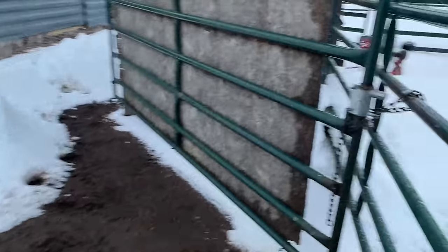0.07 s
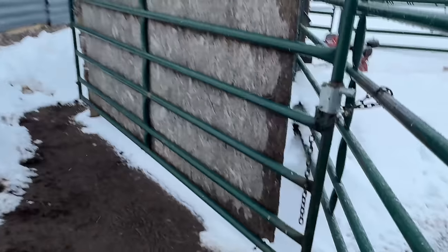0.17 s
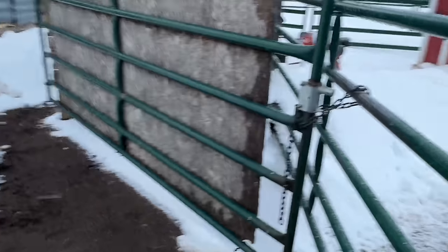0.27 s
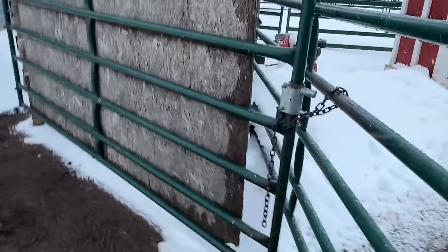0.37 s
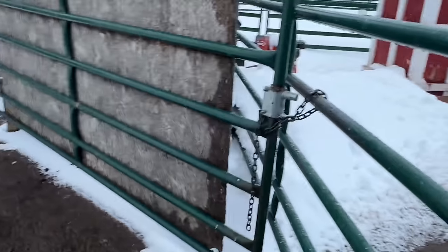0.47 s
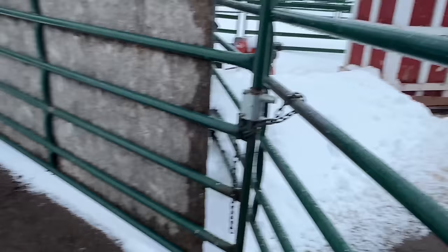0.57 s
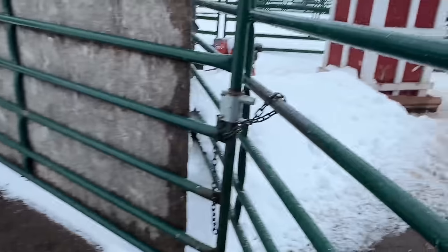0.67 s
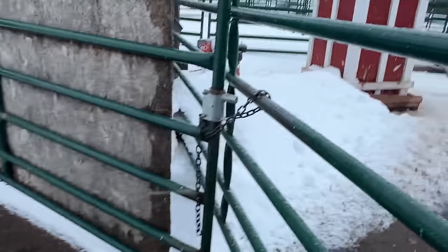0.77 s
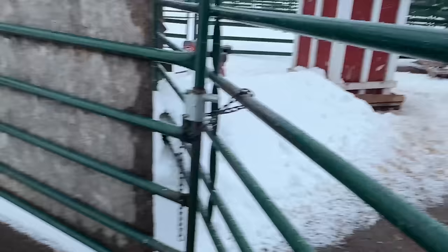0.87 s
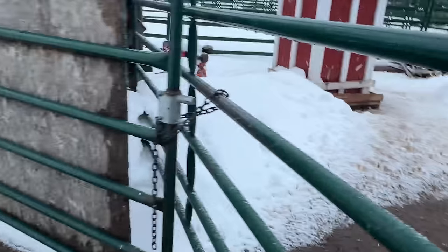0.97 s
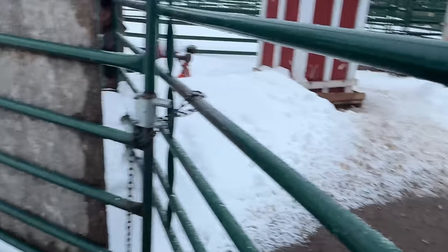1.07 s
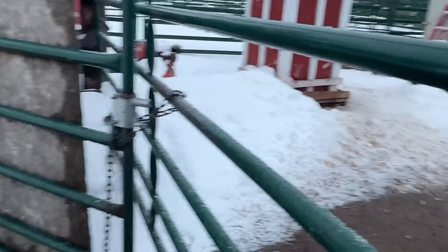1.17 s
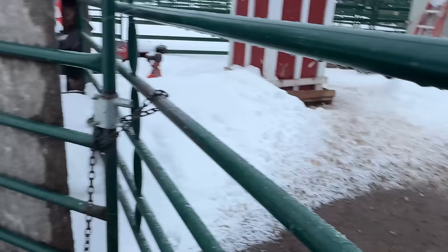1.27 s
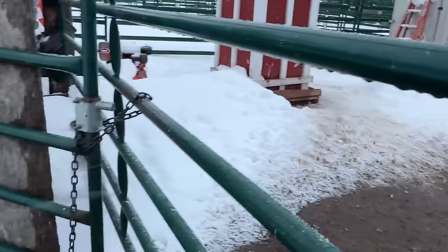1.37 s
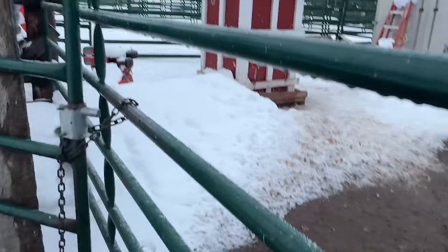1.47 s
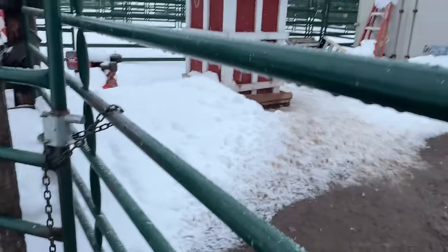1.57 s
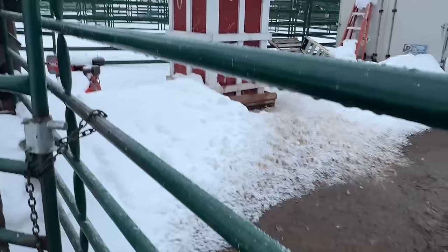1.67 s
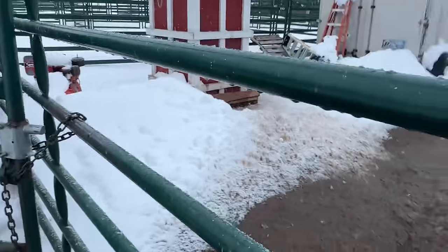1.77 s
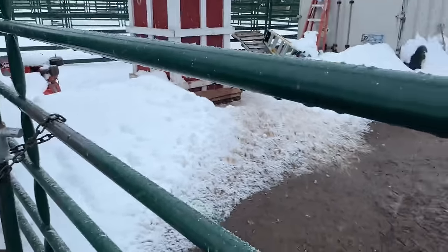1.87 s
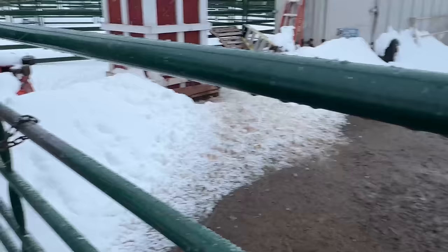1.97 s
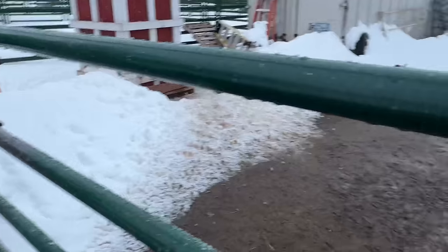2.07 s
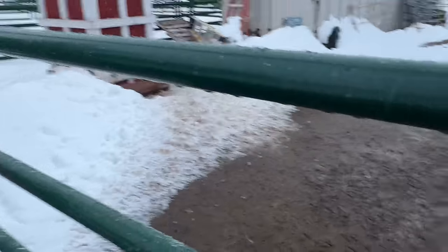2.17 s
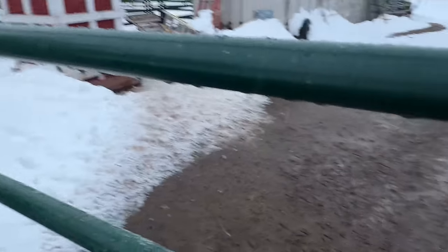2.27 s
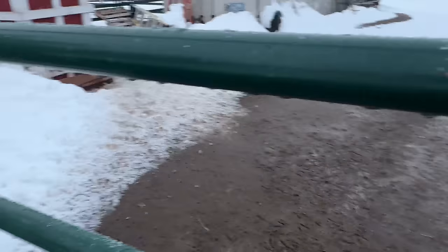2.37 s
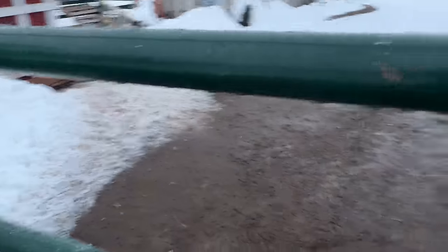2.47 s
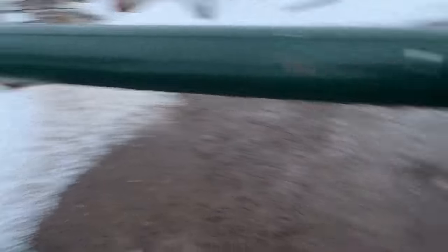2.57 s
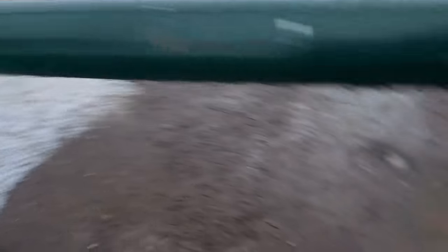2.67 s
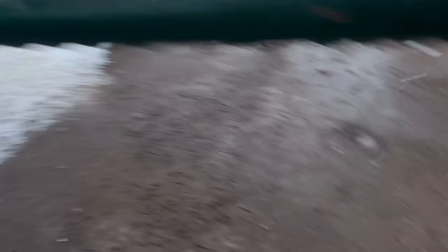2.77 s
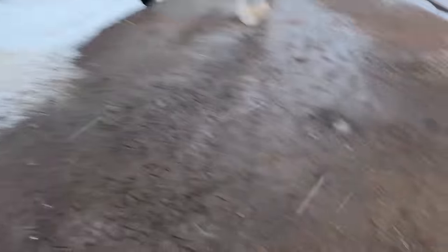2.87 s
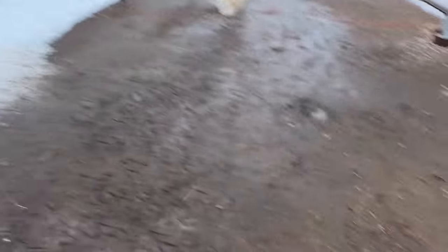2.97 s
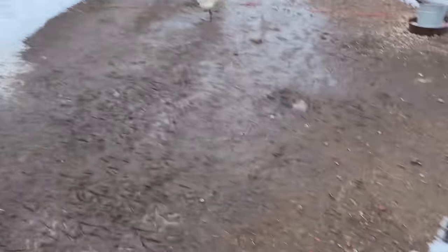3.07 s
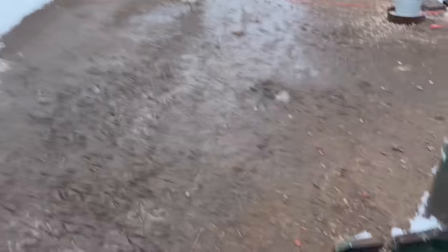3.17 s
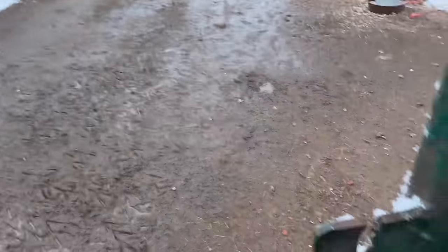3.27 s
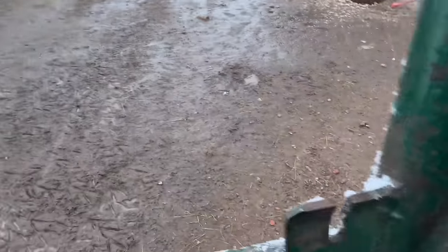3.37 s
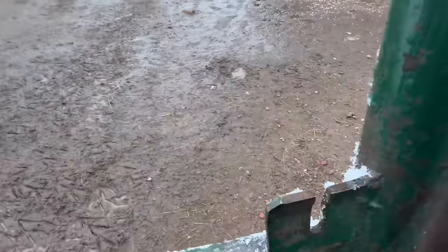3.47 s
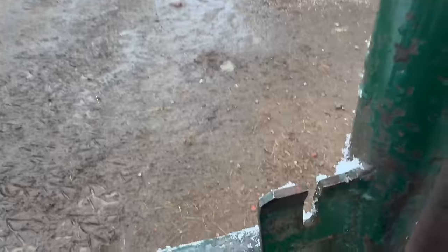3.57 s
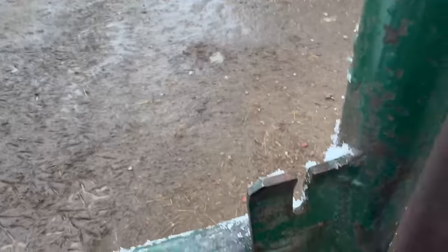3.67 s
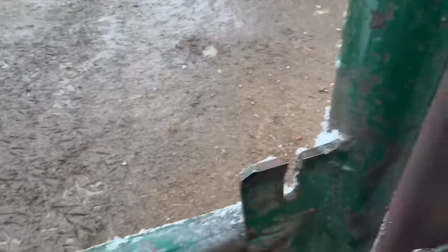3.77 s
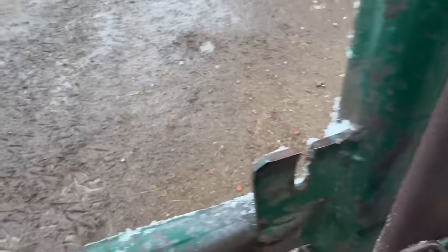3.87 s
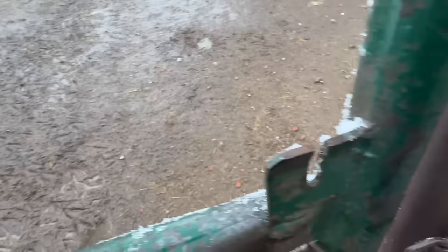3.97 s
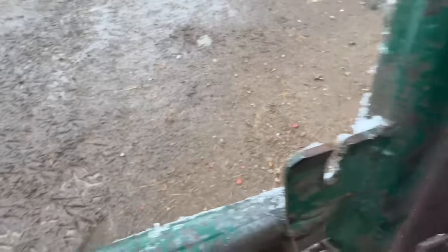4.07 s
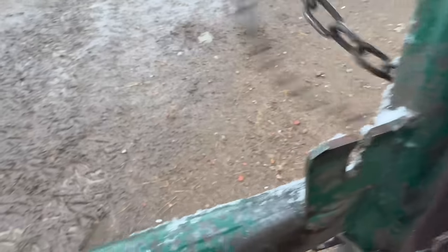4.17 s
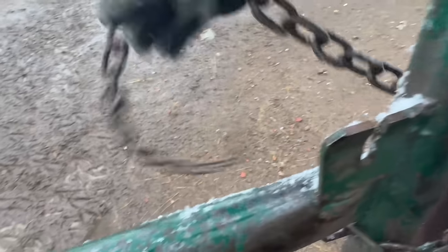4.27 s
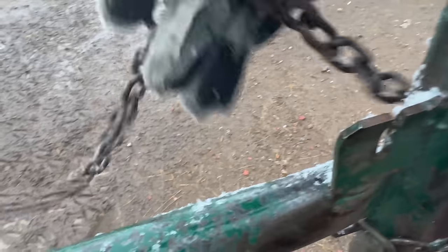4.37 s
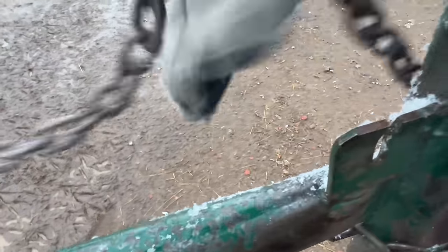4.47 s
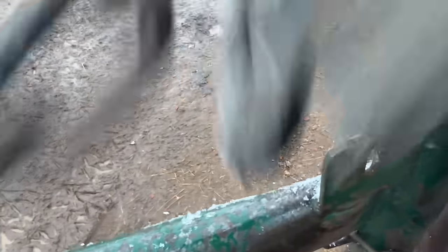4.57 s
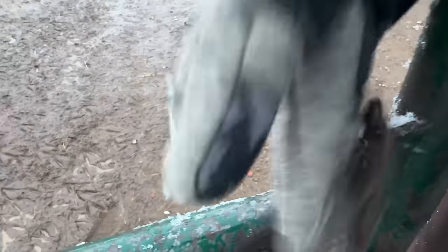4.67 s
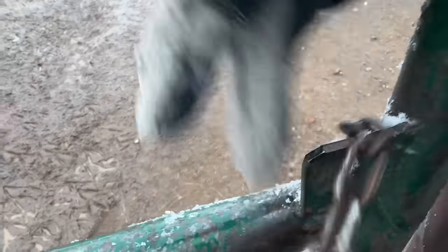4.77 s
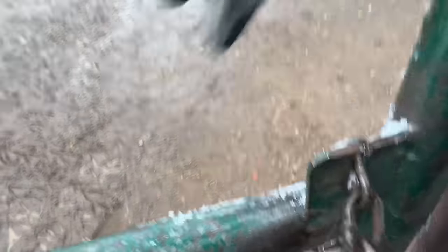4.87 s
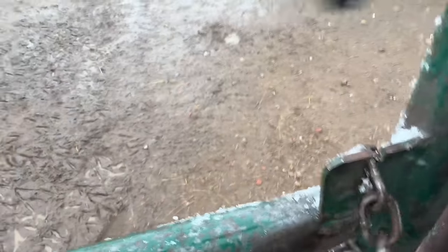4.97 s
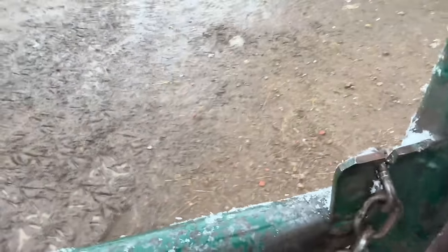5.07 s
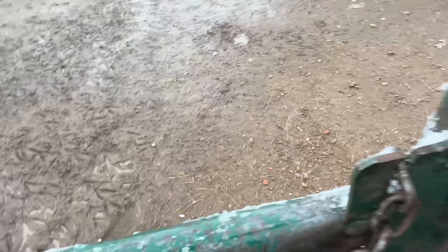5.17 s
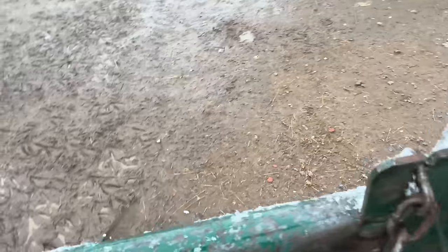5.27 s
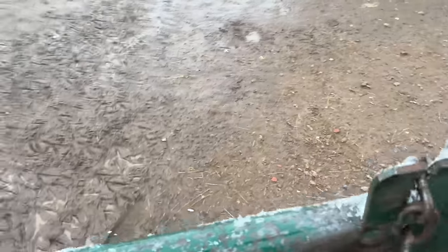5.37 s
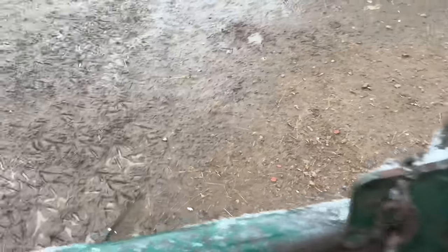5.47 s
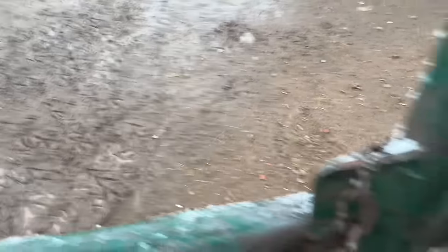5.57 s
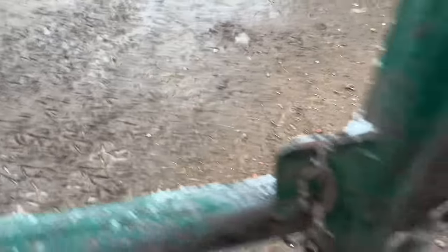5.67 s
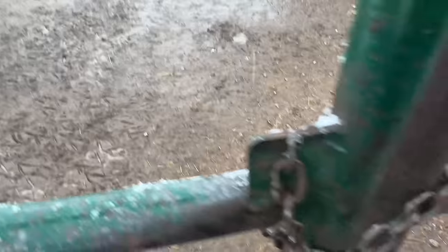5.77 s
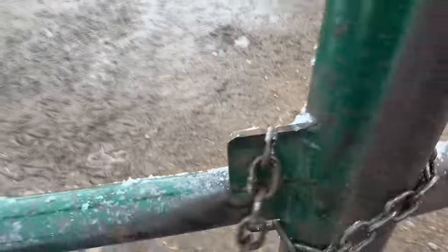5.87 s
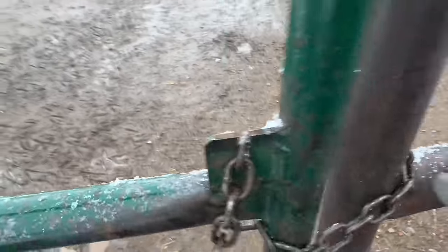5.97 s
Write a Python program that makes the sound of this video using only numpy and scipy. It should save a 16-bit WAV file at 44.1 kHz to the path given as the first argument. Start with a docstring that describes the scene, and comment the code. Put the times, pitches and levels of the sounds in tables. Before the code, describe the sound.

Quiet snowy yard, slushy footsteps and loose gate fittings knocking, then a hand-held chain clinks and clatters loudly onto a steel pipe latch.

```python
"""A steel pipe gate is swung shut in a snowy yard: noisy bursts over crowded modes are its knocking fittings.
A hand-held chain clinks, then lands on post and latch plate, whose damped sine modes ring with every blow.
Filtered noise makes the yard air, boots in slush and rustling clothes; random slips drive the dragging chain
and the groaning hinge. Low damped sines are heels and a bumping glove; gliding sines are melt-water drips."""
import sys
import numpy as np
from scipy import signal
from scipy.fft import irfft
from scipy.io import wavfile

SR = 44100
rng = np.random.default_rng(int(sys.argv[2]) if len(sys.argv) > 2 else 0)


def bounce(signal):
    """Save signal as a 16-bit WAV file at the path given by the first command-line argument."""
    frames = np.transpose(np.atleast_2d(signal))
    limited = np.clip(frames, -1, 1)
    pcm = np.round(limited * 32767).astype(np.int16)
    wavfile.write(sys.argv[1], SR, pcm)


N = 265261
TIME = np.arange(N) / SR  # [s]
BAND_EDGES = 22 * 2 ** (np.arange(30) / 3)  # third octaves [Hz]
BAND_HZ = np.sqrt(BAND_EDGES[1:] * BAND_EDGES[:-1])
CUTOFF_HZ = 15900
RIGHT_DB = -80  # right channel relative to left

# All source levels are relative: the mix applies further gains.
# noise colours of the yard: (frequency [Hz], level [dB per Hz])
YARD_LOW = [(25, -13.5), (50, -4), (90, -0.5), (150, 0), (400, 3), (600, -19), (1000, -55), (3000, -74.5)]
YARD_MIDDLE = [(100, -61.5), (300, -27.5), (550, 7), (1000, 4.5), (2000, 4), (3300, -0.5), (5000, -45),
               (9000, -65)]
YARD_HIGH = [(800, -48), (2200, -43), (3700, 7.5), (6000, 2.5), (9000, -6.5), (12000, -16.5), (15500, -49)]
AIR_LOW_DB, AIR_MIDDLE_DB, AIR_HIGH_DB = -74, -70.5, -78  # still air of the yard
# shuffling boots and rustling clothes: (start [s], length [s], level [dB], treble [dB])
SHUFFLES = [(-.04, 0.24, -61, -8), (0.443, .33, -67.5, -3.5), (0.9, 0.42, -65, -5), (1.664, 0.54, -73, -21),
            (2.054, 0.25, -67.5, -14), (2.673, 0.52, -66, -8), (3.063, 0.49, -68.5, -26),
            (3.856, 0.24, -65.5, -4.5), (4.19, 0.19, -72.5, -3), (4.837, 0.43, -62.5, -9.5),
            (5.45, 0.38, -61, -25)]
SHUFFLE_RISE_S, SHUFFLE_FADE_S, SHUFFLE_BASS_DB = 0.067, 0.083, -8
# slush giving way under a boot: (start [s], level [dB])
SQUASHES = [(.1, -60), (.27, -70), (.91, -64.5)]
SQUASH_S, SQUASH_FADE_S = 0.081, 0.059
# envelope of a boot sliding on wet snow: (time [s], level [dB])
SCUFF = [(0, -67.5), (.09, -59.5), (.18, -67), (.3, -84), (.4, -110)]
# colour of that scuff: (frequency [Hz], level [dB per Hz])
SCUFF_COLOUR = [(400, -56), (1600, -22), (1950, 14), (2400, -34), (6000, -59.5)]
# hanging chain sliding over the moving gate: (start [s], length [s], level [dB])
SLIDES = [(.82, 0.46, -62), (1.15, .15, -61.5), (1.794, 0.29, -66), (2.146, 0.31, -71),
          (2.78, 0.061, -63.5), (3.098, 0.17, -64.5)]
SLIDE_RISE_S, SLIDE_FADE_S, SLIDE_REST_DB = 0.04, 0.12, -80.5
# modes of the gate's far end and its hanging chain: (frequency [Hz], level [dB], t60 [s])
FAR_GATE = [(588.6, -8.5, .3), (629.6, -3.5, 0.29), (683, -5.5, 0.17), (966, -3.5, 0.44),
            (1039, -0.5, 0.19), (1900, -11.5, 0.367), (1910, -1, 0.29), (1957, -1, 0.3), (2347, -2, 0.21),
            (3224, -1, 0.35), (3350, -4.5, 0.11), (3460, -1.5, 0.41), (3520, -1, 0.4), (3780, -4.5, 0.2),
            (4730, -6.5, 0.18), (6200, -7, 0.096), (9000, -14, 0.159), (9330, -15, 0.14), (10000, -20, .12)]
# melt-water drips: (time [s], level [dB], start frequency [Hz], end frequency [Hz])
DRIPS = [(.003, -57.5, 1400, 1130), (1.872, -55.5, 1066, 990), (2.022, -64, 1170, 930),
         (2.162, -53.5, 1340, 1200), (3.645, -58.5, 893, 800), (4.035, -61, 980, 1210)]
# heels landing in the mud: (time [s], level [dB], frequency [Hz])
STEPS = [(0.191, -58.5, 94), (0.629, -63, 100), (0.959, -60.5, 222)]
# knocks of the gate's loose fittings, the last after it has closed:
# (time [s], level [dB], treble [dB], build-up time constant [s])
KNOCKS = [(0.3068, -55, 0, 0.00044), (.8205, -52, 4.5, 0.0028), (.9932, -55, -7, 0.00068),
          (1.090, -54, -22, 0.0025), (1.168, -53.5, -15, 0.0021), (1.5676, -53, -1, 0.00025),
          (1.6416, -60.5, 3, .001), (1.748, -59, -11, .0006), (1.768, -53.5, -7.5, 0.00066),
          (1.8429, -56.5, -1.5, 0.0069), (1.9890, -50, 2.5, 0.00075), (2.6746, -65, 0, 0.0012),
          (2.783, -50.5, -22, .0005), (2.8150, -45.5, -5, 0.0025), (3.098, -44, -4.5, 0.0083),
          (3.168, -50.5, -20, .002), (3.2339, -52.5, -17, 0.0012), (3.9194, -47, -0.5, 0.00093),
          (5.0246, -57.5, 3, .0005)]
KNOCK_BASS_DB, KNOCK_T60_S = -3, 0.27
KNOCK_T60_HALVES_DB = 42  # a harder, brighter knock dies sooner: treble rise that halves the decay time
# hollow clunks as the gate frame jolts: (time [s], level [dB])
JOLTS = [(1.220, -60), (1.86, -69), (2.3952, -65), (2.4466, -64)]
# spectrum of the crowded weak gate modes: (frequency [Hz], level [dB per Hz])
CLANG = [(30, -47), (100, -32), (300, -13.5), (600, -9.5), (1100, -2.5), (1700, 2), (3500, 3), (6500, 0.5),
         (9500, -5.5), (12000, -9), (15500, -55)]
# damping of those modes: (frequency [Hz], relative decay time [1])
CLANG_DECAY = [(200, 2.4), (900, 1.39), (2500, 0.85), (6000, 0.79), (14000, 0.68)]
# hinge groaning as the gate nears the post: (start [s], length [s], level [dB])
GROANS = [(2.807, 0.031, -62), (2.88, 0.13, -70), (3.26, .11, -65.5)]
GROAN_HZ, GROAN_WIDTH_HZ = 624, 61
# links of the held chain tapping each other: (time [s], level [dB], ring level [dB])
CLINKS = [(3.4678, -52.5, -51.5), (3.504, -72, -57), (3.537, -65.5, -56), (3.6173, -54, -51),
          (3.7728, -53.5, -53.5), (3.8436, -54.5, -66), (3.8713, -50.5, -57), (3.945, -52.5, -50),
          (4.085, -59, -62), (4.1521, -53.5, -48.5), (4.379, -64, -77)]
# dry tick of a pinched link: (time [s], level [dB])
TICKS = [(4.0114, -47)]
CLINK_T60_S, TICK_T60_S = 0.25, .007
# modes of a link damped by the hand: (frequency [Hz], level [dB], t60 [s])
HELD_LINK = [(3833, 2, 0.13), (6510, -8, 0.087), (3890, -7, 0.038), (9900, -28, 0.069), (10750, -13, 0.068)]
# the chain landing on latch and post: (time [s], level [dB], loss per following link [dB], bass [dB],
# treble [dB], t60 [s], clank of the trapped link [Hz], plate ring level [dB], link ring level [dB])
LANDINGS = [(4.4797, -39, 26, 1.5, 5.5, 0.25, 9650, -75, -36),
            (4.4835, -35, 23, -1, 1, 0.072, 3230, -62, -44),
            (4.6968, -33.5, 14, 0, 1.5, 0.23, 6150, -49, -50.5),
            (4.800, -52, 3, 10.5, -7, 0.33, 2474, -66, -70),
            (4.8286, -39.5, 7.5, -9, 4.5, 0.26, 6400, -63, -50.5),
            (4.857, -39, 8, 7, -1, 0.23, 2480, -71, -59), (5.152, -25, 1.1, -5, -0.5, 0.21, 9050, -47, -32),
            (5.346, -34, 24, -6, -5.5, 0.61, 5517, -59, -53),
            (5.3546, -33, 5, -3, 1.5, 0.28, 5000, -55, -44),
            (5.3924, -32.5, .3, -5.5, .5, 0.26, 2150, -51.5, -41),
            (5.5627, -40.5, 16, 3, 0, 0.087, 4060, -71, -67),
            (5.58, -41, 4.5, -13, -1, 0.32, 4870, -67, -54),
            (5.628, -33, 6, 6.5, 6, 0.28, 1300, -38.5, -48)]
LINK_GAP_S = .009  # the following links land one after another
SETTLED_DB = 17  # a run of links has settled once it has lost this much
PIPE_SHARE_DB = -20  # pipe ring relative to the contact that excites it
# blows before this time ring shorter and their pipes are quieter by this much
EARLY_UNTIL_S, EARLY_PIPE_LOSS_DB = 5.5, 2.5
# modes of the gate pipes: (frequency [Hz], level [dB], t60 [s])
PIPE = [(367, -18.5, .8), (426, -16, 0.52), (616, -10.5, .41), (683.2, -4.5, 0.43), (968, -0.5, 0.72),
        (1030, -2.5, 0.36), (1282, -5.5, .4), (1340.4, 0.5, 0.51), (1370, 0.5, .1), (1536, 5, 0.34),
        (1780, -3, .25), (1938, 8, 0.51), (1982, 8.5, 0.16), (2233, 8, 0.24), (2438, 3, 0.35),
        (2568, 3, .35), (3080, -11, .3), (3557, -1.5, 0.24), (3520, 1.5, .4), (3660, -1.5, 0.49),
        (3767, -5, 0.58), (4075, 1, 0.44), (4570, -5, 0.59), (4850, -6.5, .25)]
# modes of the latch plate: (frequency [Hz], level [dB], t60 [s])
PLATE = [(4785, -3.5, 0.3), (4870, -14.5, .18), (5100, -8.5, 0.22), (5670, -2, .28), (5920, 4, .25),
         (6050, -3, 0.32), (6390, -0.5, .25), (6767, 2, 0.2), (6700, -3, .15), (7230, -6.5, 0.2),
         (7540, 0.5, 0.25), (8220, -11, .18)]
# first and second bending modes of several nearly alike links: (frequency [Hz], level [dB], t60 [s])
LINK = [(3175, -3.5, 0.91), (3143, -5, 0.9), (3240, -2, 0.94), (3262, -7, .8), (3247, -8.5, 0.79),
        (3410, -10.5, .9), (3476, -13.5, 0.46), (3310, -9, 0.29), (8900, -14, .17), (8860, -6, 0.31),
        (8790, -13.5, 0.16), (8830, -6.5, 0.3), (8930, -8.5, 0.43), (8980, -8, 0.216), (9437, -11, .1)]
# glove bumping close by: (time [s], level [dB], frequency [Hz], t60 [s])
BUMPS = [(4.808, -47, 207, 0.025), (4.847, -37, 424, 0.025), (4.851, -44, 322, 0.04),
         (4.864, -36.5, 466, 0.024), (4.885, -37, 507, 0.055), (4.888, -47, 124, 0.093),
         (4.900, -27.5, 816, 0.005), (4.909, -42, 466, 0.05)]


def from_db(db):
    """Logarithmic level: every 20 dB is a tenfold amplitude."""
    return 10 ** (np.asarray(db) / 20)


def at_bands(points):
    """Interpolation over logarithmic frequency, read at the band centres."""
    hz, value = np.transpose(points)
    return np.interp(np.log(BAND_HZ), np.log(hz), value)


def band_gains(spectrum):
    """Spectral density times bandwidth gives band power; the total is normalised to 1."""
    gains = from_db(at_bands(spectrum)) * np.sqrt(BAND_HZ)
    return gains / np.linalg.norm(gains)


def add(track, s, sound):
    """Superposition: mix a sound into a track at time s."""
    start = max(round(s * SR), 0)
    track[start:start + len(sound)] += sound[:N - start]


def swell(start_s, length_s, rise_s, fade_s):
    """Envelope: linear rise, a hold to the end of the length, exponential decay."""
    rise = np.clip((TIME - start_s) / rise_s, 0, 1)
    return rise * np.exp(-np.maximum(TIME - start_s - length_s, 0) / fade_s)


def high_pass(x, hz):
    """High-pass filter: removes the bass below hz."""
    return signal.sosfilt(signal.butter(2, hz, "high", fs=SR, output="sos"), x)


def split(sources):
    """Band analysis: third octaves of rms 1, dealt in turn from two unrelated sources."""
    bands = []
    for k in range(len(BAND_HZ)):
        band_pass = signal.butter(2, BAND_EDGES[k:k + 2], "band", fs=SR, output="sos")
        bands.append(signal.sosfilt(band_pass, sources[k % 2]))
    bands = np.array(bands)
    return bands / bands.std(axis=1, keepdims=True)


def crowded_modes(spacing_hz, spread_db, haze_db, count=400):
    """Modal density: unevenly spaced and strong steel partials over a haze of unresolved ones."""
    hz = np.cumsum(rng.uniform(.3, 1.7, count)) * spacing_hz
    phases = np.exp(2j * np.pi * rng.random(count))
    partials = from_db(spread_db * rng.uniform(-1.04, 1, count)) * phases
    spectrum = np.zeros(N // 2 + 1, complex)
    audible = hz < CUTOFF_HZ
    spectrum[(hz[audible] * N / SR).astype(int)] = partials[audible]
    tones = irfft(spectrum, N)
    return tones / tones.std() + from_db(haze_db) * rng.standard_normal(N)


def ring(times, levels_db, modes, spread_db):
    """Modal superposition: each contact strikes every mode, with a strength set by where it lands."""
    out, t = np.zeros(N), TIME[:SR]
    hz, mode_db, t60 = np.transpose(modes)[:, :, None]
    shapes = from_db(mode_db - 60 * t / t60) * np.sin(2 * np.pi * hz * t)
    shapes[1::2] *= -1  # neighbouring table rows have opposite polarity
    strengths = from_db(spread_db * rng.standard_normal((len(times), len(modes))))
    for s, level_db, strength in zip(times, levels_db, strengths):
        add(out, s, from_db(level_db) * (strength @ shapes))
    return out


def clang(bands, level_db, bass_db, treble_db, t60, clank_hz, clank_db, crack_db, crack_s, chatter_db):
    """Impact and damping: a crack, then the crowded steel modes decay, highs first."""
    t = TIME[:int(SR * .7)]
    tilt_db = at_bands([(800, bass_db), (2800, 0.015), (8000, treble_db)])
    gains = band_gains(CLANG) * from_db(tilt_db)
    band_t60 = max(t60, .005) * at_bands(CLANG_DECAY)[:, None]
    decay = np.exp(-np.log(1000) * t / band_t60)
    start = rng.integers(N - len(t))
    body = gains @ (bands[:, start:start + len(t)] * decay)
    # the striking piece is damped by the contact and adds one broad resonance
    clank = signal.lfilter(*signal.iirpeak(clank_hz, 8, fs=SR), body)
    body = body + from_db(clank_db) * clank
    # steel rebounds on steel about once a millisecond before it settles
    rebounds = np.interp(t, np.arange(1000) / 1000, rng.standard_normal(1000))
    chatter = from_db(chatter_db * rebounds * np.exp(-t / 0.029))
    crack = 1 + from_db(crack_db) * np.exp(-t / crack_s)
    return high_pass(from_db(level_db) * body * chatter * crack, hz=161)


def yard():
    """Broadband noise: open-air rumble, slush, rustling clothes and one squeaky scuff."""
    bands = split(rng.standard_normal((2, N)))
    moves = [from_db(level_db) * swell(s, length_s, SHUFFLE_RISE_S, SHUFFLE_FADE_S)
             for s, length_s, level_db, _ in SHUFFLES]
    bright_moves = [move * from_db(treble_db) for move, (*_, treble_db) in zip(moves, SHUFFLES)]
    # unrelated noises add in power
    shuffle = np.linalg.norm(moves, axis=0)
    rustle = np.linalg.norm(bright_moves, axis=0)
    squash = sum(from_db(level_db) * swell(s, SQUASH_S, SQUASH_S, SQUASH_FADE_S)
                 for s, level_db in SQUASHES)
    tread = np.hypot(from_db(SHUFFLE_BASS_DB) * shuffle, squash)
    low = np.hypot(from_db(AIR_LOW_DB), tread) * (band_gains(YARD_LOW) @ bands)
    middle = np.hypot(from_db(AIR_MIDDLE_DB), shuffle) * (band_gains(YARD_MIDDLE) @ bands)
    high = np.hypot(from_db(AIR_HIGH_DB), rustle) * (band_gains(YARD_HIGH) @ bands)
    scuff = from_db(np.interp(TIME, *np.transpose(SCUFF))) * (band_gains(SCUFF_COLOUR) @ bands)
    return low + middle + high + scuff


def dragging_chain(per_s=170, size_db=5):
    """Friction excitation: many tiny slips keep the far end of the gate softly ringing."""
    happens = rng.random(N) < per_s / SR
    slips = happens * from_db(size_db * rng.standard_normal(N)) * rng.choice([-1, 1], N)
    response = ring([0], [0], FAR_GATE, spread_db=1.5)[:SR] * np.exp(-TIME[:SR] / 0.072)
    sound = signal.fftconvolve(slips, response)[:N]
    sliding = np.max([from_db(level_db) * swell(s, length_s, SLIDE_RISE_S, SLIDE_FADE_S)
                      for s, length_s, level_db in SLIDES], axis=0)
    return np.hypot(from_db(SLIDE_REST_DB), sliding) * sound / sound.std()


def drips(length_s=0.037):
    """Frequency glide: each drip is a short plip whose pitch moves linearly."""
    out, phase = np.zeros(N), np.linspace(0, 1, int(length_s * SR))
    for s, level_db, start_hz, end_hz in DRIPS:
        turns = np.cumsum(start_hz + (end_hz - start_hz) * phase) / SR
        envelope = np.sin(np.pi * phase ** 0.48) ** 2
        add(out, s, from_db(level_db) * envelope * np.sin(2 * np.pi * turns))
    return out


def boots(t60=0.13):
    """Damped oscillation: each heel gives a dull, short thump."""
    return sum(ring([s], [level_db], [(hz, 0, t60)], spread_db=4.5) for s, level_db, hz in STEPS)


def gate_fittings(bands, dull_hz=11500):
    """Impact excitation: fittings knock sharply or in a quick pile-up, the frame clunks; distance dulls."""
    out = np.zeros(N)
    for s, level_db, treble_db, build_s in KNOCKS:
        t60 = KNOCK_T60_S * 2 ** (-treble_db / KNOCK_T60_HALVES_DB)
        knock = clang(bands, level_db, KNOCK_BASS_DB, treble_db, t60, clank_hz=1940, clank_db=-6,
                      crack_db=-5.5, crack_s=0.0045, chatter_db=5.0)
        build_up = 1 - np.exp(-TIME[:len(knock)] / max(build_s, 1e-4))
        add(out, s, knock * build_up)
    for s, level_db in JOLTS:
        clunk = clang(bands, level_db, bass_db=19.5, treble_db=-13, t60=0.45, clank_hz=1060, clank_db=-5,
                      crack_db=-24, crack_s=.005, chatter_db=-0.5)
        add(out, s, clunk)
    out = signal.sosfilt(signal.butter(2, dull_hz, fs=SR, output="sos"), out)
    times, levels_db = np.transpose(KNOCKS)[:2]
    return from_db(1.54) * out + from_db(-16) * ring(times, levels_db, FAR_GATE, spread_db=2.0)


def hinge(slips_per_s=250, rise_s=.015, fade_s=0.031):
    """Stick-slip and resonance: uneven slips of the hinge excite one low mode of the frame."""
    slips = (rng.random(N) < slips_per_s / SR) * rng.standard_normal(N)
    resonance = signal.iirpeak(GROAN_HZ, GROAN_HZ / GROAN_WIDTH_HZ, fs=SR)
    sound = signal.lfilter(*resonance, slips + 1e-18)
    groaning = sum(from_db(level_db) * swell(s, length_s, rise_s, fade_s) for s, length_s, level_db in GROANS)
    return groaning * sound / sound.std()


def held_chain(bands):
    """Damped impact: links tap each other in the hand and ring briefly; a pinched one only ticks."""
    out = np.zeros(N)
    taps = [(s, level_db, CLINK_T60_S) for s, level_db, _ in CLINKS]
    taps += [(s, level_db, TICK_T60_S) for s, level_db in TICKS]
    for s, level_db, t60 in taps:
        tap = clang(bands, level_db, bass_db=5.0, treble_db=-5, t60=t60, clank_hz=4300, clank_db=1.5,
                    crack_db=-5.5, crack_s=0.0018, chatter_db=0.0)
        add(out, s, tap)
    times, _, ring_db = np.transpose(CLINKS)
    return from_db(-1.05) * out + ring(times, ring_db, HELD_LINK, spread_db=3.5)


def free_links(times, levels_db, surge_db=9, surge_s=0.0065, waver_hz=13, spread_db=2.64, early_ring=0.82):
    """Coupled decay: links quickly lose energy to neighbours, then sing on, wavering as they swing."""
    out, t = np.zeros(N), TIME[:SR]
    hz, mode_db, t60 = np.transpose(LINK)[:, :, None]
    surge = from_db(mode_db) * (1 + from_db(surge_db) * np.exp(-t / surge_s))
    polarity = (-1) ** np.arange(len(LINK))
    for s, level_db in zip(times, levels_db):
        # early blows ring shorter
        t60_factor = early_ring if s < EARLY_UNTIL_S else 1
        decay = surge * np.exp(-np.log(1000) * t / (t60 * t60_factor))
        swing = rng.standard_normal(size=(len(LINK), 70))
        waver = np.array([np.interp(t, np.linspace(0, 1, len(row)), row) for row in swing])
        turns = np.cumsum(hz + waver_hz * np.sqrt(hz / hz[0]) * waver, axis=1) / SR
        strength = from_db(spread_db * rng.standard_normal(len(LINK))) * polarity
        add(out, s, from_db(level_db) * (strength @ (decay * np.sin(2 * np.pi * turns))))
    return out


def latch(bands, count=4):
    """Successive impacts: links land ever weaker until settled; pipes, plate and free links all ring."""
    out, contacts = np.zeros(N), []
    for s, level_db, loss_db, bass_db, treble_db, t60, clank_hz, plate_db, link_db in LANDINGS:
        pipe_db = level_db + PIPE_SHARE_DB - EARLY_PIPE_LOSS_DB * (s < EARLY_UNTIL_S)
        # the trapped link clanks on the first contact;
        # the followers clank at random pitches scattered around 3300 Hz
        clanks_hz = [clank_hz, *(3300 * 2 ** (.5 * rng.standard_normal(count - 1)))]
        for k, hz in enumerate(clanks_hz):
            at_s, lost_db = s + k * LINK_GAP_S, k * loss_db
            if lost_db < SETTLED_DB:
                blow = clang(bands, level_db - lost_db, bass_db, treble_db, t60, hz, clank_db=-0.5,
                             crack_db=-3.5, crack_s=0.00067, chatter_db=2.5)
                add(out, at_s, blow)
                contacts.append((at_s, pipe_db - lost_db, plate_db - lost_db, link_db - lost_db))
    times, pipe_db, plate_db, link_db = np.transpose(contacts)
    pipes = from_db(-0.5) * ring(times, pipe_db, PIPE, spread_db=1.0)
    plate = from_db(-3.0) * ring(times, plate_db, PLATE, spread_db=2.0)
    links = from_db(-1.5) * free_links(times, link_db)
    return high_pass(from_db(-1.2) * out + pipes + plate + links, hz=150)


def glove():
    """Heavy damping: each soft bump is a low mode that dies quickly."""
    thuds = sum(ring([s], [level_db], [(hz, 0, t60)], spread_db=0.5) for s, level_db, hz, t60 in BUMPS)
    return high_pass(thuds, hz=70)


def scene():
    """Superposition: all sources sum into the left channel; the right stays all but silent."""
    bands = split([crowded_modes(spacing_hz=69.84, spread_db=7, haze_db=-3.5) for _ in range(2)])
    steel = gate_fittings(bands) + dragging_chain() + held_chain(bands) + latch(bands)
    total = steel + glove() + boots() + drips() + yard() + hinge()
    return 2 * total * from_db([[0], [RIGHT_DB]])


def record(dry):
    """Band limiting: a steep elliptic low-pass cuts the top."""
    return signal.sosfilt(signal.ellip(10, .1, 70, CUTOFF_HZ, fs=SR, output="sos"), dry)


dry = scene()
out = record(dry)
bounce(out)
```